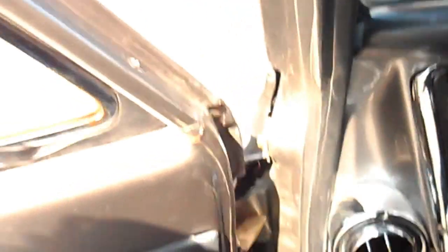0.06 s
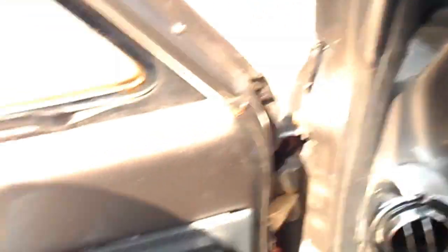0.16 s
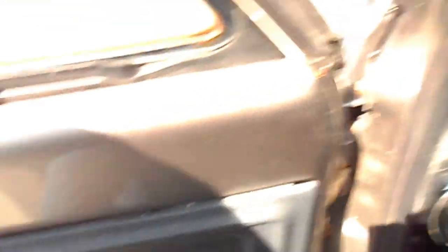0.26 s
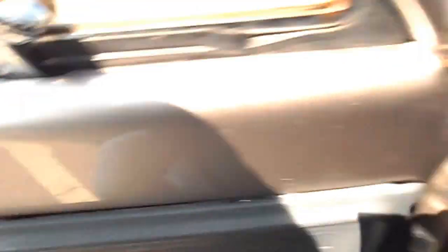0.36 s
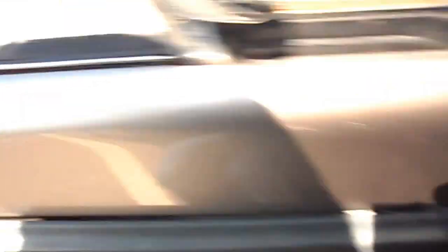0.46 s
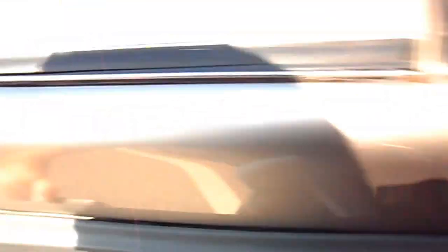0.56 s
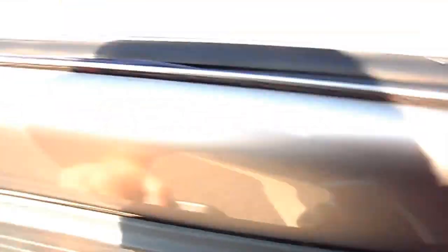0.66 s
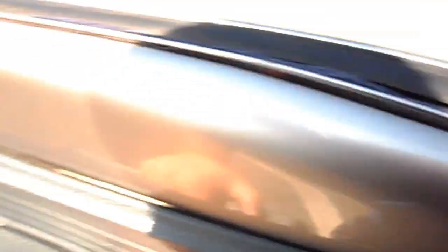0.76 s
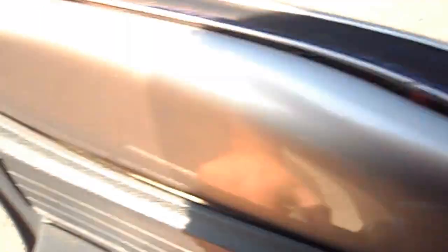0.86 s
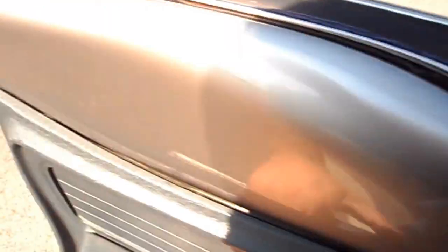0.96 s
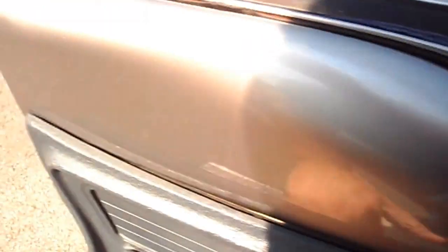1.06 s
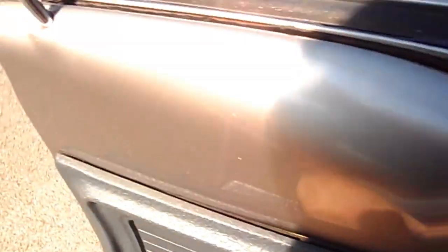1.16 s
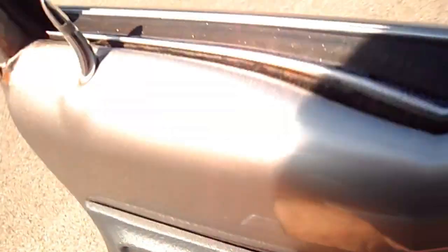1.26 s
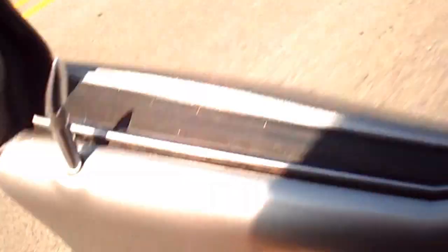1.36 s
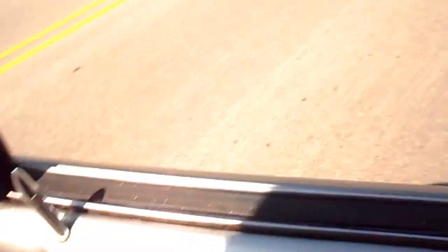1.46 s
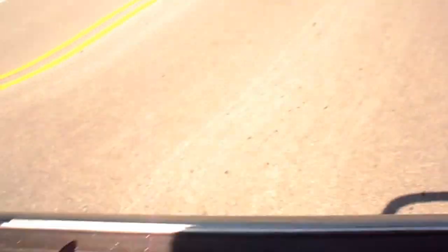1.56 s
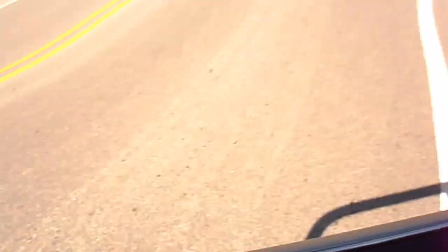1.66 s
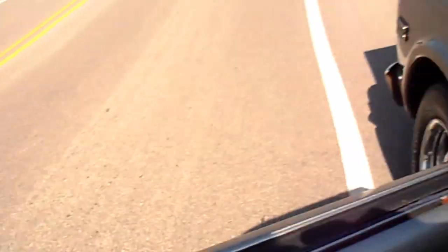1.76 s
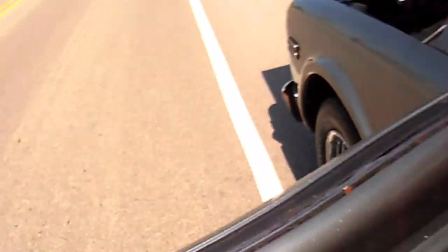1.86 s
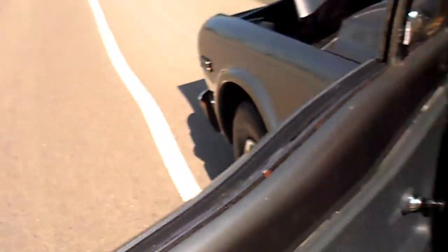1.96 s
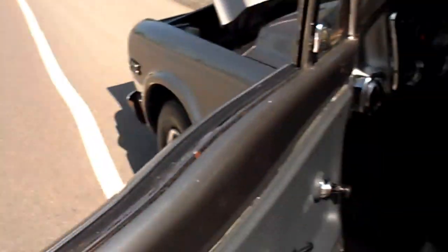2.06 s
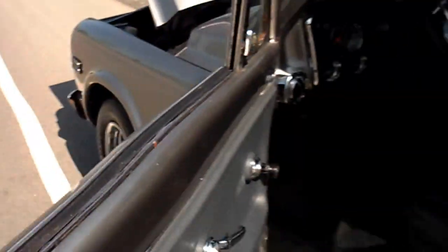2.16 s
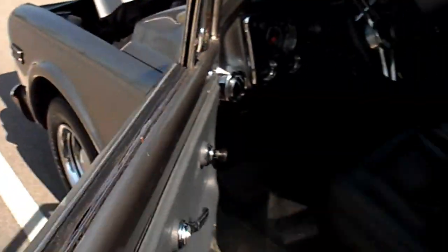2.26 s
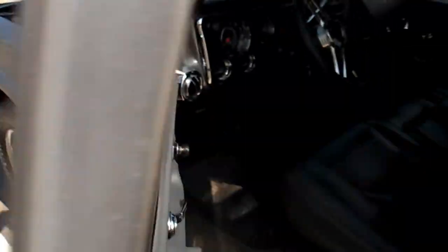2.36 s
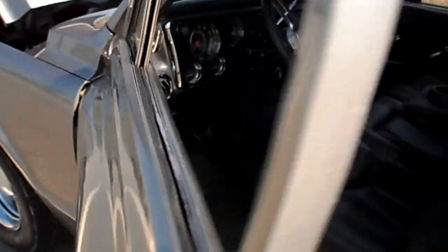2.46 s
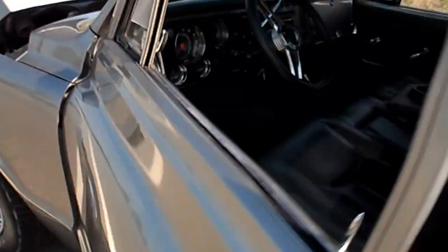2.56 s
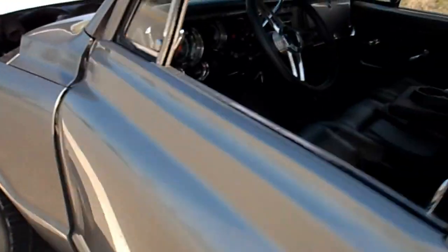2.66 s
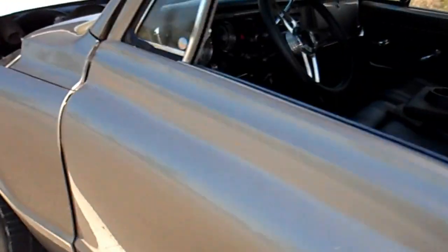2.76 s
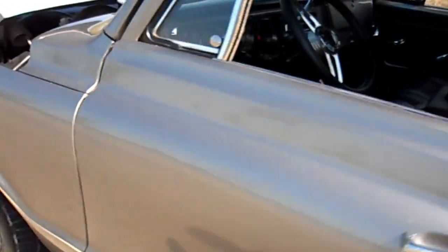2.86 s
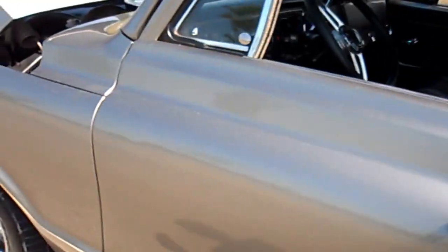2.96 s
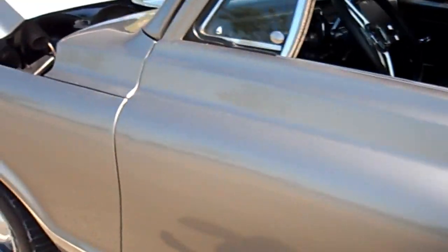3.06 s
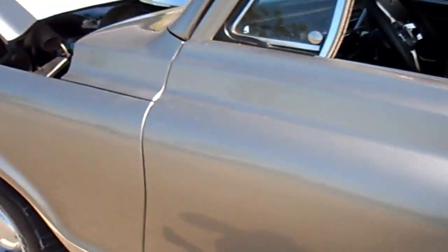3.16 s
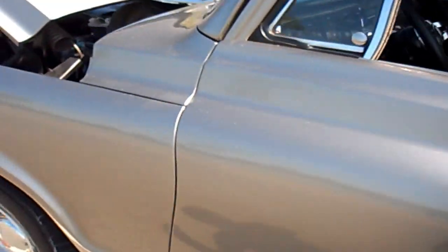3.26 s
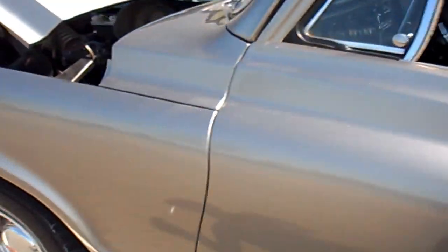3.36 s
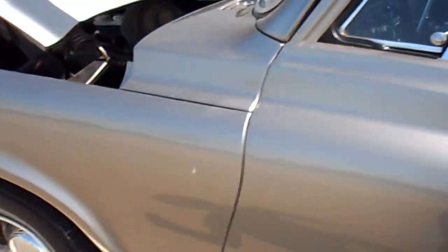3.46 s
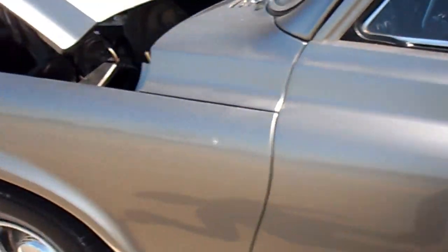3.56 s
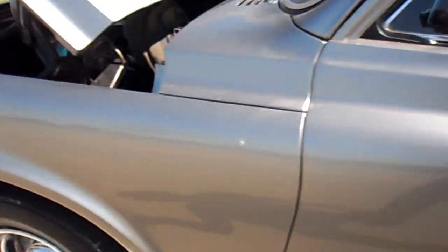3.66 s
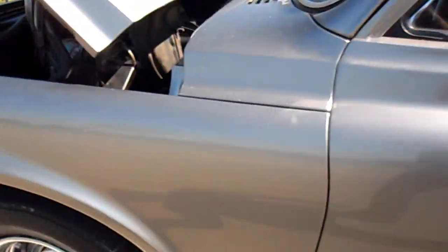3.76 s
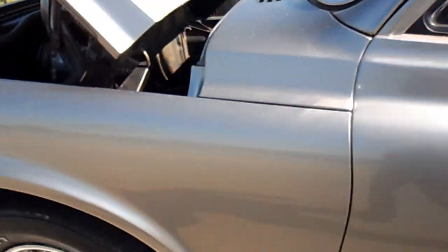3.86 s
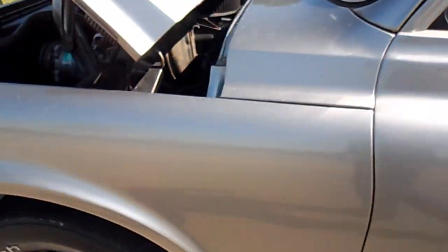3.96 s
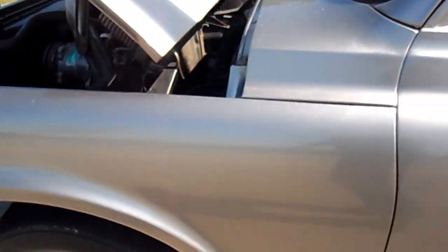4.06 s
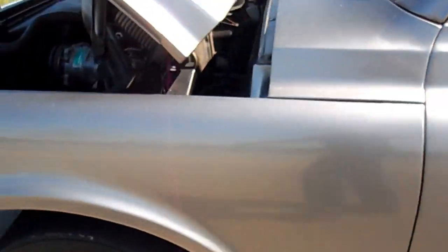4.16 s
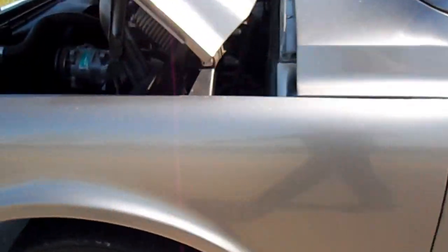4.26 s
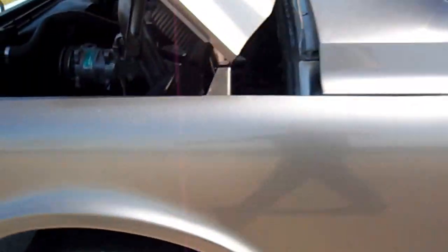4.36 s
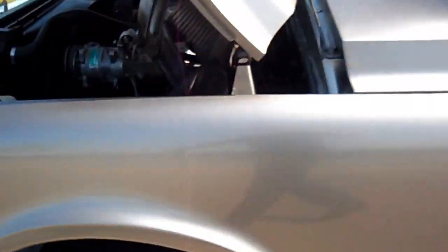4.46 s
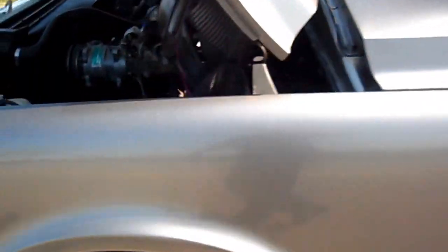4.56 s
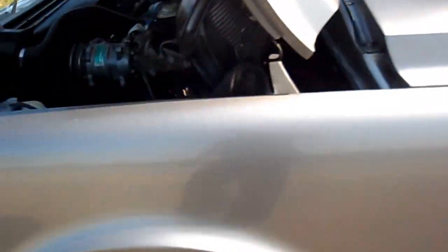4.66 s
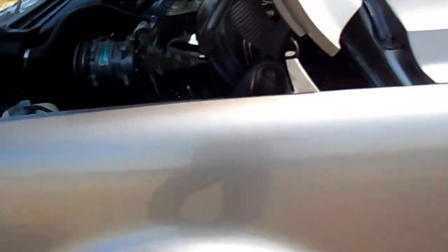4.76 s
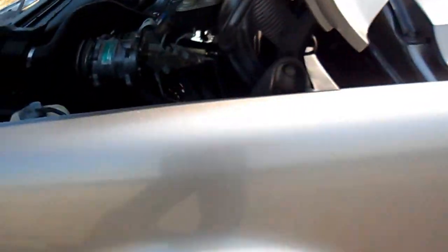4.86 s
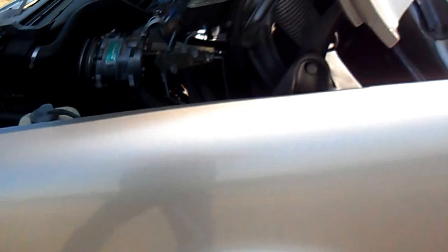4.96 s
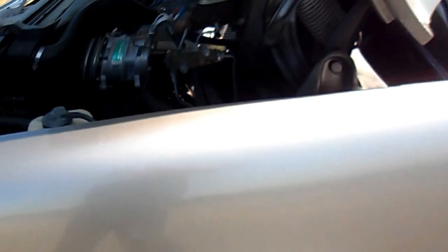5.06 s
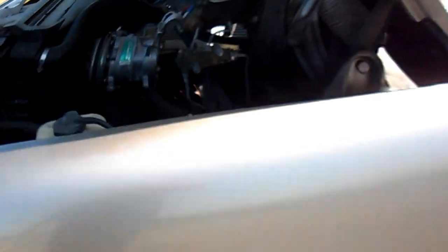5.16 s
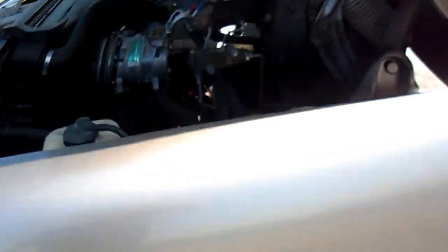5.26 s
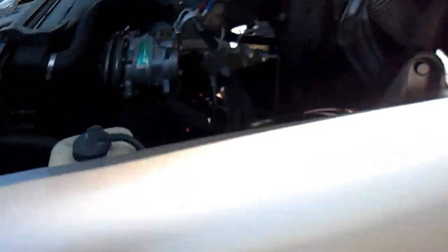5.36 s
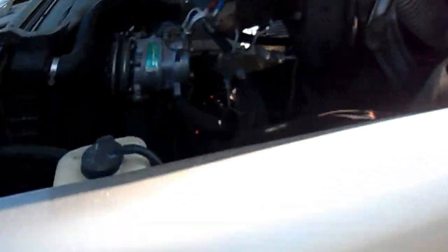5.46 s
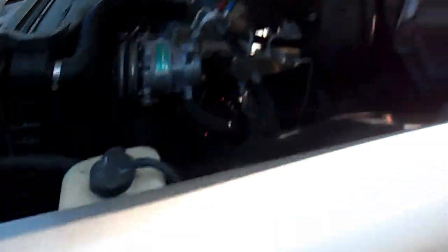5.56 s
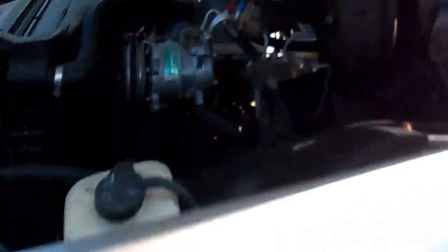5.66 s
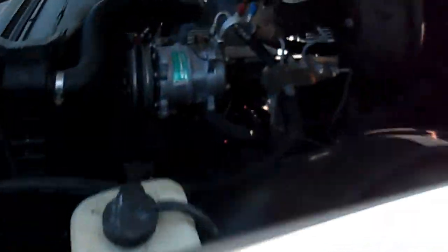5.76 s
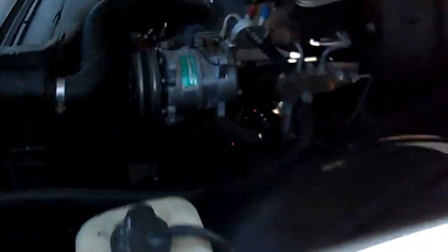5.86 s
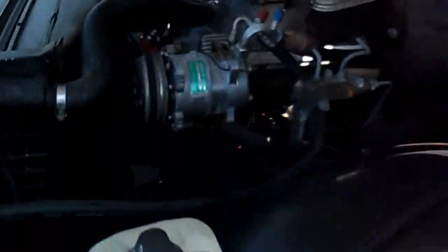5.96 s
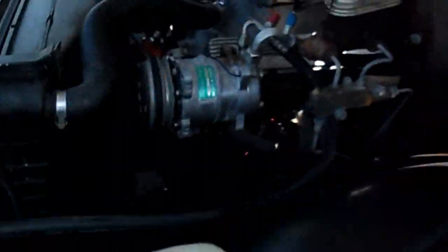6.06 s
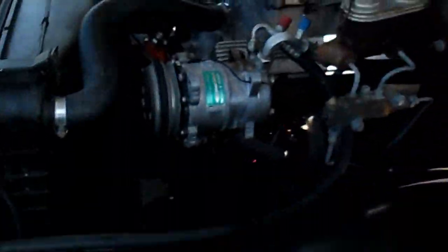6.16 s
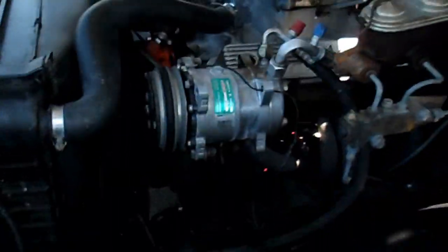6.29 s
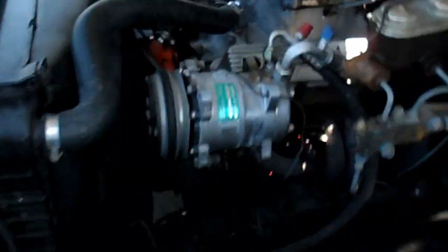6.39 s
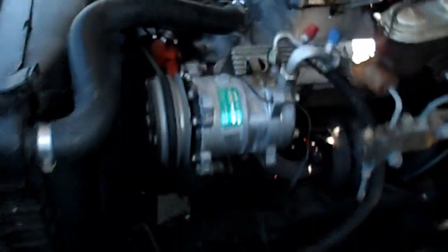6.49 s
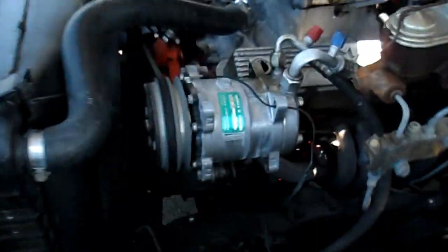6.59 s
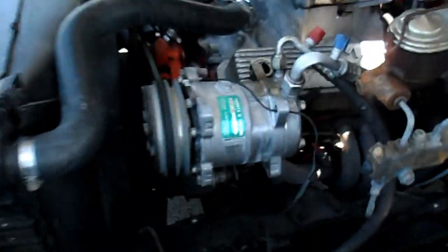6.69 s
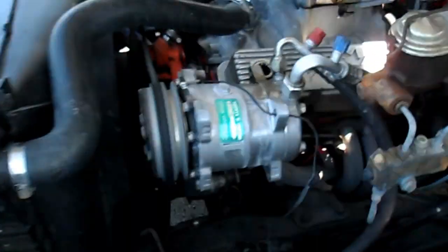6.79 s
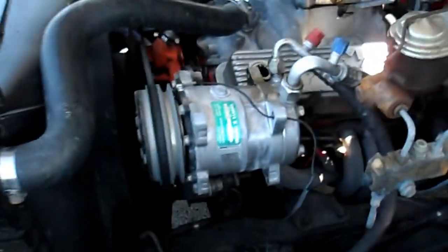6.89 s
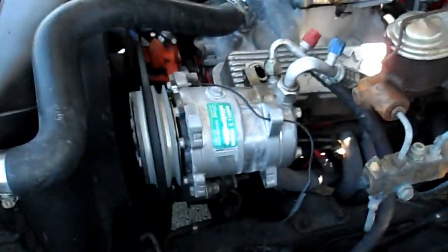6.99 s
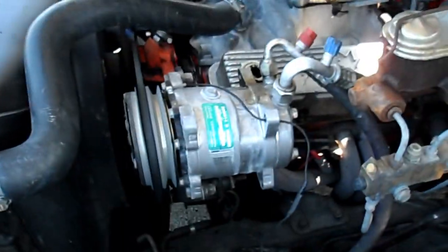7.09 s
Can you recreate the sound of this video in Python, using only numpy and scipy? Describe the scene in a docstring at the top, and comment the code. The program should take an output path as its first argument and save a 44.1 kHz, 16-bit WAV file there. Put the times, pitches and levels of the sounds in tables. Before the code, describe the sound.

From 0 s a V8 idles fast and lumpy, its deep exhaust throbbing unevenly around 100 Hz, near seventeen surges a second. For the first half second the open cab adds a low boom and dulls the treble; then the sound opens out, with soft fan rush, fine valve clatter and faint ringing metal. Light wind rumbles, with small knocks around 0.7 to 1.2 s and 2.8 s, and a barely audible bright tick at 1.0 s. At 3.2 s the door slams: several tight metallic contacts, short panel ring and a deep air thump. From 3.3 to 6 s the microphone nears the open engine; hiss, rapid ticking and rough, high belt chirps grow close and bright. Gusts start hitting at 6.0 s, with the most violent thumps and crackling blow near 6.5 s. The engine level drops abruptly, then creeps back, still running at 7.1 s with another knock near 6.95 s.

```python
"""Beside a pickup: a V8 at fast, lumpy idle, the microphone moving from open door to open bonnet.
Exhaust: cosine lines on engine-cycle orders, plus gas noise pulsed by uneven firings through pipe resonances.
Engine bay: shaped noise for fan rush, valve clatter and ringing metal; gliding chirps for the belt.
A door slam (noise, decaying panel modes, low boom), a faint tick and gusts (low noise, steep pulses) come on top.
The gain control ducks on loud peaks, mostly big blows, and creeps back."""
import sys
import numpy as np
from scipy import signal
from scipy.fft import rfft, irfft
from scipy.io import wavfile
from scipy.ndimage import uniform_filter1d, minimum_filter1d

SR = 44100
rng = np.random.default_rng(int(sys.argv[2]) if len(sys.argv) > 2 else 0)


def dump_mix(stems):
    """Bounce the given channels to the path in sys.argv[1] as a 16-bit WAV at rate SR."""
    frames = np.atleast_2d(stems).T  # one column per channel
    limited = np.clip(frames, -1, 1)  # hard clip at full scale
    pcm = np.round(limited * 32767).astype(np.int16)
    wavfile.write(sys.argv[1], SR, pcm)


N = 314433
TIME_S = np.arange(N) / SR
FREQ_HZ = np.maximum(np.fft.rfftfreq(N, 1 / SR), 1)

# engine speed in four-stroke cycles: time_s, cycles_hz
ENGINE_SPEED = [(0.0, 8.8), (0.25, 8.8), (0.5, 9.0), (0.75, 8.88), (1.0, 8.57), (1.25, 8.47), (1.75, 8.51),
                (2.25, 8.6), (2.75, 8.64), (3.25, 8.58), (3.5, 8.74), (4.0, 8.77), (4.5, 8.81), (5.0, 8.84),
                (5.5, 8.9), (6.25, 8.94), (7.0, 8.8)]
START_TURN_CYCLES = 0.26
# eight firings in order, uneven on the near bank: strength_db
FIRING_STRENGTHS = [1, 1.5, -30, -2.5, -14, 1, -0.5, -15.5]
# exhaust lines; 11 and 13 beat as the cross-plane throb: order_per_cycle, door_db, bonnet_db
EXHAUST_ORDERS = [(3, -14, -20), (5, -23, -31), (8, -6.5, -6.5), (10, -15, -6), (11, 2, 1), (12, 0, -45),
                  (13, 0.5, 1), (14, -23, -2.5), (15, -14.5, -10), (17, -13.5, -4.5), (18, -11.5, -14.5),
                  (21, -14, -11.5), (22, -20, -15), (23, -21, -32), (24, -7.5, -8), (25, -10.5, -12.5),
                  (26, -24, -19), (27, -13.5, -14), (32, -15, -15), (33, -12.5, -14.5), (34, -22, -31.5),
                  (35, -19.5, -18), (36, -17, -17.5), (42, -22.5, -19), (44, -24, -28), (45, -22, -56)]
# exhaust level, uneven in the doorway: time_s, level_db
EXHAUST_LEVEL = [(0, -19.5), (.18, -13.5), (.3, -21.5), (.43, -22), (.55, -16.5), (1.3, -18), (2.4, -15.5),
                 (3.7, -16.5), (4.8, -15), (5.5, -18), (6.1, -14.5), (7.13, -18)]
# pipes and underbody, stirred by gas flow: centre_hz, width_hz, level_db
PIPE_MODES = [(116, 120, 7.5), (214, 75, -12), (288, 70, 5), (378, 56, -15)]
# cab air resonance: centre_hz, width_hz, level_db
CAB_MODES = [(43.6, 9.1, 0)]
# cab boom through the open door: time_s, level_db
CAB_LEVEL = [(0, -17.5), (.2, -24), (.4, -17.5), (.52, -39), (.8, -45), (3.2, -60)]
# cab muffling of upper exhaust lines and hiss: time_s, gain_db
CAB_MUFFLE = [(.4, -3.5), (1.1, 0)]

# walk along the truck: time_s, share_door_to_bonnet (0-1)
WALK_SHARE = [(3.1, 0.09), (4.5, 1)]
# microphone to engine: time_s, distance_m
ENGINE_DISTANCE = [(0, 2.3), (.45, 3), (1.2, 2.97), (1.9, 1.92), (2.6, 1.81), (3.2, 1.48), (4.2, 1.105),
                   (5.1, 0.71), (6, .5), (6.5, 0.5), (7.13, 0.66)]

# fan and engine bay spectrum: freq_hz, density_db_per_hz
BAY_SPECTRUM = [(120, 20), (220, 7.5), (330, 3), (470, 1), (750, 2.5), (1200, -2.5), (1900, -6),
                (3000, -7.5), (4300, -7.5), (5300, -11.5), (6700, -12), (9000, -17), (12500, -24.5),
                (15500, -32.5)]
# hollows of the engine bay: centre_hz, width_hz, level_db
HOLLOW_MODES = [(661, 21, -2), (836, 8.9, 0.5), (1196, 19, 0.5), (1480, 23, -29), (1694, 16, -10.5)]
# ringing metal on the engine: centre_hz, width_hz, level_db
METAL_MODES = [(2256, 21, 0), (2310, 42, -4), (2385, 48, -8)]
# ringing metal relative to the hiss: time_s, level_db
RING_LEVEL = [(.5, 2.5), (1.5, 9), (1.9, 3.5), (2.6, 1), (4.2, 0.5), (4.65, 5.5), (5.65, -0.5), (6.08, 3),
              (6.3, -1)]
RUSH_1M_DB, HISS_1M_DB = -29.5, -38.5
SHADE_DB_PER_DOUBLING = 2  # extra hiss loss per doubling of distance

# slick belt spots, levels relative to the hiss: place_in_lap (0-1), pitch_hz, door_db, bonnet_db
BELT_SPOTS = [(.387, 6720, 5.3, 6.3), (.697, 5840, 6.8, -3), (.776, 6830, 5.3, 5.3), (.788, 6080, -6, 4)]
BELT_LAPS_PER_CYCLE = 0.7958
BELT_MUFFLE_DB_PER_DB = 2.4  # on top of the hiss muffling
CHIRP_WOBBLE_HZ, CHIRP_GLIDE_HZ = 260, 170

# door meets latch, striker and seal: time_s, level_db, t60_s
SLAM_CONTACTS = [(3.2126, 0, 0.056), (3.217, -0.5, 0.11), (3.23, -3, 0.1), (3.238, 4, 0.052),
                 (3.248, -4, 0.3)]
# door panel spectrum: freq_hz, density_db_per_hz
DOOR_SPECTRUM = [(60, 8), (200, 8.5), (500, 0), (950, 1.5), (1600, -3), (2800, -10.5), (4500, -15.5),
                 (7200, -18), (10000, -24.5), (15500, -39)]
# door panel modes: freq_hz, level_db, t60_s
PANEL_MODES = [(950, -9, 0.066), (1480, -13, 0.12), (2105, -14, 0.062), (2540, -53, 0.41), (3700, -36, .12),
               (4440, -20, 0.075)]
SEAL_S = 3.231  # door closes on its seal
TICK_S, TICK_DB, TICK_HZ = 1.0111, -37, 11400

# wind turbulence, 2 dB below its rms: time_s, level_db
WIND_LEVEL = [(0, -35), (.5, -29), (.8, -25), (3.1, -24), (4.4, -22.5), (5.3, -30), (5.85, -32),
              (6.3, -13.5), (6.62, -3.5), (6.8, -18.5), (6.95, -9), (7.13, -21)]
# gusts striking the microphone: time_s, half_length_s, push_db, eddies_db, upper_edge_hz
GUST_STRIKES = [(0.739, .026, -9, -16, 169), (.78, .02, -18, -22, 380), (.994, 0.013, -10.5, -13, 89),
                (1.191, 0.0051, -16, -10, 250), (2.222, .006, -23, -25, 412),
                (2.797, 0.011, -9, -13.5, 332), (4.343, 0.021, -7, -15, 88), (5.618, 0.02, -14, -15, 111),
                (6.032, .003, 5.5, -14, 400), (6.042, .0045, 5.5, -14, 210), (6.203, .02, -4, -13, 108),
                (6.249, .0035, 7.5, -12, 254), (6.285, 0.02, 2, -9.5, 114), (6.381, .0066, 3, -12, 420),
                (6.428, 0.012, -2, -7, 427), (6.48, 0.0029, -5, -13, 500), (6.505, 0.005, 6.5, -2.5, 507),
                (6.509, .0007, 17, 3, 1430), (6.515, .0025, -16, -8, 1410), (6.552, 0.0069, 6, -2.5, 394),
                (6.629, .0048, 1, -3.5, 470), (6.646, 0.003, 8.5, -3.5, 760), (6.941, .003, -4, -10, 715),
                (6.949, .008, 4, -5, 367)]

CEILING_DB, DETECTOR_S, HOLD_S, RELEASE_S = -1, 0.0007, 0.18, 0.72
TOP_HZ = 15750


def undb(db):
    """Decibels to gain."""
    return 10 ** (np.asarray(db) / 20)


def curve(table, column=1):
    """Table column, linear in time."""
    rows = np.array(table)
    return np.interp(TIME_S, rows[:, 0], rows[:, column])


def unit(x):
    """Scale to rms 1."""
    return x / (np.std(x) + 1e-12)


def noise():
    """White noise."""
    return rng.standard_normal(N)


def wander(rate_hz):
    """Random wander joined by straight lines, spread near 1."""
    knots_s = np.arange(0, TIME_S[-1] + 1, 0.5 / rate_hz)
    values = rng.standard_normal(len(knots_s))
    # sqrt(3/2) restores the spread lost to interpolation
    return np.sqrt(3 / 2) * np.interp(TIME_S, knots_s, values)


def butter(x, edge_hz, kind, order=2):
    """Low-, high- or band-pass."""
    safe_hz = np.clip(edge_hz, 0.1, SR / 2 - 100)
    return signal.sosfilt(signal.butter(order, safe_hz, kind, fs=SR, output="sos"), x)


def colour(x, spectrum):
    """Filter by (Hz, dB) points, falling away below the first."""
    hz, db = np.transpose(spectrum)
    gain = undb(np.interp(np.log(FREQ_HZ), np.log(hz), db))
    low_cut = np.minimum(FREQ_HZ / hz[0], 1) ** 2
    return irfft(rfft(x) * gain * low_cut, N)


def resonate(x, modes):
    """Parallel resonances, each (Hz, width Hz, dB)."""
    response = 0
    for hz, width_hz, db in modes:
        detuning = (FREQ_HZ ** 2 - hz ** 2) / (FREQ_HZ * width_hz)
        response = response + undb(db) / (1 + 1j * detuning)
    return irfft(rfft(x) * response, N)


def decay(start_s, t60_s):
    """Sudden onset, exponential fall of 60 dB in t60_s."""
    age_s = np.maximum(TIME_S - start_s, 0)
    return (TIME_S >= start_s) * np.exp(-np.log(1000) * age_s / t60_s)


def strokes(turn, pattern_db, scatter_db, jitter_s):
    """Pulses evenly spaced in the engine cycle, jittered, with a repeating, scattered strength pattern."""
    count = len(pattern_db)
    index = np.arange(np.ceil(turn[0] * count), turn[-1] * count).astype(int)
    chance = rng.standard_normal((len(index), 2))
    at_s = np.interp(index / count, turn, TIME_S) + jitter_s * chance[:, 0]
    size = undb(np.array(pattern_db)[index % count] + scatter_db * chance[:, 1])
    return np.bincount(np.clip(at_s * SR, 0, N - 1).astype(int), size, N)


def puffs(pulses, decay_s):
    """Each pulse opens a short envelope, fading by 1/e in decay_s."""
    return signal.lfilter([1], [1, -np.exp(-1 / (decay_s * SR))], pulses)


def exhaust_lines(turn, spread_rad=1.3, waver=0.15, waver_hz=5):
    """Uneven banks give lines on engine-cycle orders; long pipes disperse each beat."""
    along = np.clip(curve(WALK_SHARE), 0, 1)
    muffle = undb(curve(CAB_MUFFLE))
    lines = np.zeros(N)
    for order, door_db, bonnet_db in EXHAUST_ORDERS:
        phase = 2 * np.pi * order * turn + spread_rad * (order - 12) ** 2
        # orders above 12 waver more
        unsteady = waver * max(order / 12, 1)
        size = undb(door_db) + along * (undb(bonnet_db) - undb(door_db))
        if order > 16:
            size = size * muffle
        swell = 1 + unsteady * wander(waver_hz)
        lines += size * swell * np.cos(phase + unsteady * wander(waver_hz))
    return lines


def exhaust(turn, firings, level_db, burble_db=-13.5, throb_db=1.0):
    """Order lines and gas burble throb with the flow; firings boom the cab air."""
    lines = exhaust_lines(turn)
    gas = puffs(firings, decay_s=0.0074) * noise()
    burble = butter(resonate(gas, PIPE_MODES), 363, "lowpass", order=3)
    # two surges a cycle, one stronger
    surge_db = throb_db * np.cos(4 * np.pi * turn)
    lope_db = 1.4 * np.cos(2 * np.pi * (turn - 0.4))
    throb = undb(surge_db + lope_db + 0.61 * wander(8) - 0.57)
    # two passes sharpen the cab resonance
    cab = resonate(resonate(firings, CAB_MODES), CAB_MODES)
    flow = lines * undb(-1.7) + unit(burble) * undb(burble_db)
    return flow * throb * undb(level_db) + unit(cab) * undb(curve(CAB_LEVEL))


def engine_bay(turn, firings, rush_db, hiss_db, ring_db, tap_db=-5, clatter_db=-1):
    """Fan noise with firing-pulsed hollows below; hiss, valve clatter, sharp taps and ringing metal above."""
    valve_db = [0.5, 4, -8.5, 6.5, -13.5, 4.5, -4.5, -7]
    valves = strokes(turn, valve_db, scatter_db=2.5, jitter_s=0.0011)
    clatter = unit(puffs(valves, decay_s=0.03) * noise())
    # tappets snap shut
    taps = unit(butter(puffs(valves, decay_s=0.005) * noise(), 5600, "highpass", order=1))

    chuff = unit(puffs(firings, decay_s=0.007) * noise())
    hollows = butter(resonate(chuff, HOLLOW_MODES), 660, "highpass")
    rush = colour(noise() * undb(0.24 * wander(10)), BAY_SPECTRUM) + undb(-0.5) * hollows
    hiss = colour(noise() + undb(clatter_db) * clatter + undb(tap_db) * taps, BAY_SPECTRUM)

    # levels refer to rms in a reference band
    rush = butter(rush, 1980, "lowpass") / np.std(butter(rush, [700, 1800], "bandpass"))
    hiss = butter(hiss, 2540, "highpass") / np.std(butter(hiss, [3000, 5200], "bandpass"))
    ring = butter(resonate(clatter, METAL_MODES), [2050, 2550], "bandpass") * undb(1.1 * wander(9.8))
    return rush * undb(rush_db) + hiss * undb(hiss_db) + unit(ring) * undb(ring_db)


def belt(turn, level_db, length_s=0.006, scatter_hz=170, scatter_db=2.5, jitter_s=0.0018):
    """Each slick spot slips at the pulley: a short, rough chirp, randomly detuned and sliding."""
    out = np.zeros(N)
    wobble = wander(490)
    along = np.clip(curve(WALK_SHARE), 0, 1)
    laps = BELT_LAPS_PER_CYCLE * turn
    for lap in range(int(laps[-1]) + 1):
        for place, hz, door_db, bonnet_db in BELT_SPOTS:
            late, detune, slide, strength = rng.standard_normal(4)
            if not laps[0] < lap + place < laps[-1]:
                continue
            start_s = np.interp(lap + place, laps, TIME_S) + jitter_s * late
            first = max(int((start_s - 4 * length_s) * SR), 0)
            span = slice(first, int((start_s + 4 * length_s) * SR))
            age = (TIME_S[span] - start_s) / length_s
            glide_hz = CHIRP_GLIDE_HZ * slide * np.tanh(age)
            pitch_hz = hz + scatter_hz * detune + glide_hz + CHIRP_WOBBLE_HZ * wobble[span]
            spot_db = door_db + along[span] * (bonnet_db - door_db)
            size = undb(level_db[span] + spot_db + scatter_db * strength)
            out[span] += size * np.exp(-age ** 2 / 2) * np.sin(2 * np.pi * np.cumsum(pitch_hz) / SR)
    return out


def door(boom_hz=23, boom_db=12, boom_t60_s=0.24):
    """Quick metal contacts ring the panel; air pushed into the cab swings slowly after."""
    power = sum((undb(db) * decay(start_s, t60_s)) ** 2 for start_s, db, t60_s in SLAM_CONTACTS)
    crash = unit(colour(noise(), DOOR_SPECTRUM)) * np.sqrt(power)

    first_s = SLAM_CONTACTS[0][0]
    panel = np.zeros(N)
    for hz, db, t60_s in PANEL_MODES:
        panel += undb(db) * decay(first_s, t60_s) * np.sin(2 * np.pi * hz * (TIME_S - first_s))

    swell = decay(SEAL_S, boom_t60_s) - decay(SEAL_S, boom_t60_s / 2)
    swing = np.sin(2 * np.pi * boom_hz * (TIME_S - SEAL_S) + np.pi / 4)
    return crash + panel + undb(boom_db) * swell / swell.max() * swing


def tick():
    """One faint, very bright tick of quickly fading noise."""
    bright = unit(resonate(noise(), [(TICK_HZ, 6000, 0)]))
    return undb(TICK_DB) * decay(TICK_S, 0.02) * bright


def wind(core_share=0.54):
    """Low turbulence, plus gusts that knock on the microphone with eddies and a steep pressure swing."""
    low = butter(noise(), 75, "lowpass", order=3)
    out = unit(butter(low, 9.2, "highpass")) * undb(curve(WIND_LEVEL) + 2)
    for start_s, length_s, push_db, eddy_db, hz in GUST_STRIKES:
        span = slice(int((start_s - 4 * length_s) * SR), int((start_s + 4 * length_s) * SR))
        age_s = TIME_S[span] - start_s
        shape = np.exp(-(age_s / length_s) ** 2 / 2)
        # filter extra noise, keep the settled end
        rough = butter(rng.standard_normal(SR // 2), hz, "lowpass", order=3)
        eddy = butter(rough, hz / 4, "highpass", order=1)[-len(shape):] * shape
        eddy *= np.sqrt(np.sum(shape ** 2) / np.sum(eddy ** 2))
        # gust core: one steep push and pull
        core = np.pi * core_share * hz * age_s
        knock = -3 * core / (1 + core ** 2) ** 2 * shape
        out[span] += undb(eddy_db) * eddy + undb(push_db) * knock
    return out


def gain_control(x):
    """Duck at once by the excess over the ceiling, hold, then creep back."""
    window = int(DETECTOR_S * SR)
    half_hold = int(HOLD_S * SR / 2)
    level_db = 10 * np.log10(np.maximum(uniform_filter1d(x ** 2, window), 1e-12))
    excess_db = np.minimum(CEILING_DB - level_db, 0)
    # shifted window: looks back only
    held_db = minimum_filter1d(excess_db, 2 * half_hold + 1, origin=half_hold, mode="constant")
    fade = np.exp(-TIME_S / RELEASE_S)
    duck_db = np.minimum.accumulate(held_db / fade) * fade
    return x * undb(uniform_filter1d(duck_db, window))


def scene():
    """One crankshaft drives exhaust, bay and belt; distance sets bay level and treble. The rest is added on top."""
    turn = START_TURN_CYCLES + np.cumsum(curve(ENGINE_SPEED)) / SR
    firings = strokes(turn, FIRING_STRENGTHS, scatter_db=2.8, jitter_s=0.00028)
    distance_m = curve(ENGINE_DISTANCE)
    near_db = -20 * np.log10(distance_m)
    muffle_db = curve(CAB_MUFFLE)
    # the body shades the treble
    shade_db = SHADE_DB_PER_DOUBLING * np.log2(distance_m)
    hiss_db = HISS_1M_DB + near_db - shade_db + muffle_db
    engine = exhaust(turn, firings, curve(EXHAUST_LEVEL))
    engine += engine_bay(turn, firings, RUSH_1M_DB + near_db, hiss_db, hiss_db + curve(RING_LEVEL))
    engine += belt(turn, hiss_db + BELT_MUFFLE_DB_PER_DB * muffle_db)
    return (engine + door() + tick() + wind())[None]


def record(dry):
    """Ride the gain, round off the highest peaks, cut the top."""
    ducked = gain_control(dry[0])[None]
    rounded = ducked / (1 + ducked ** 8) ** (1 / 8)
    top_cut = signal.ellip(10, 0.2, 80, TOP_HZ, fs=SR, output="sos")
    return signal.sosfilt(top_cut, rounded)


dry = scene()
out = record(dry)
dump_mix(out)
```